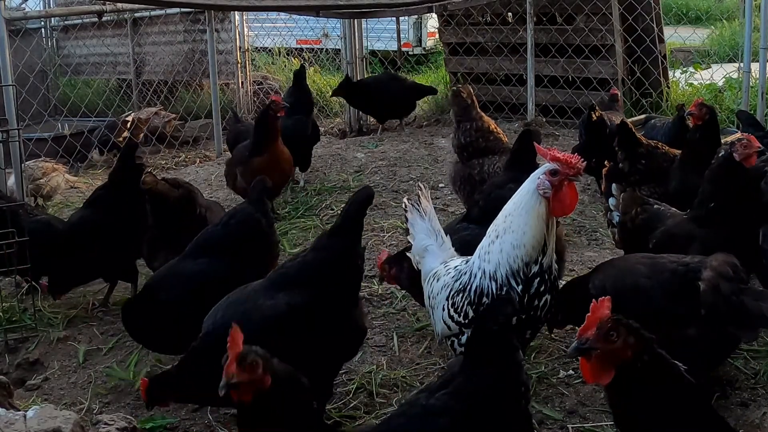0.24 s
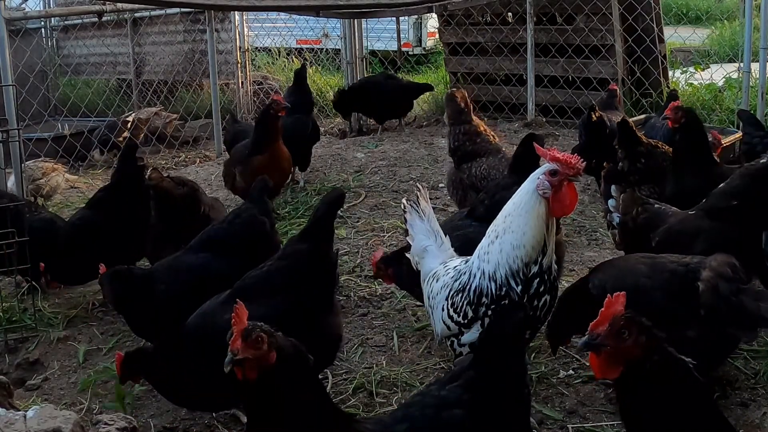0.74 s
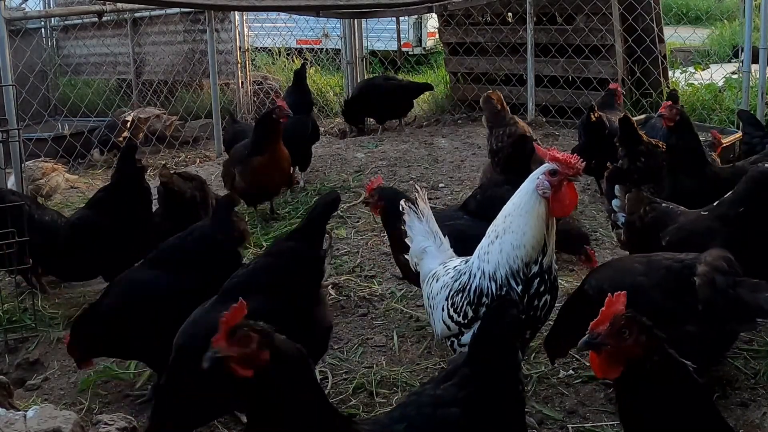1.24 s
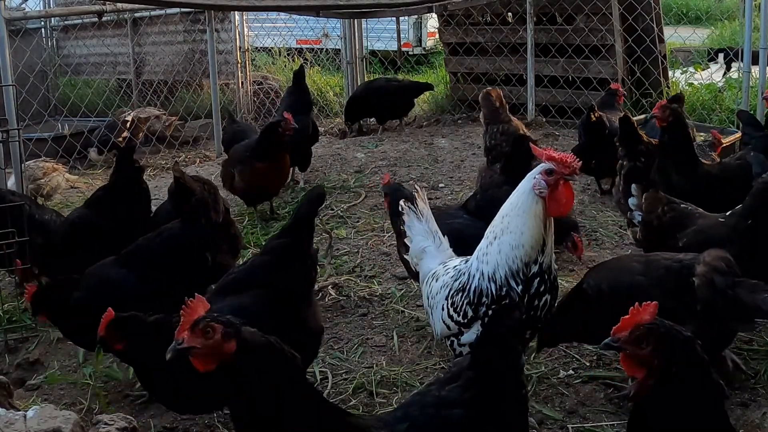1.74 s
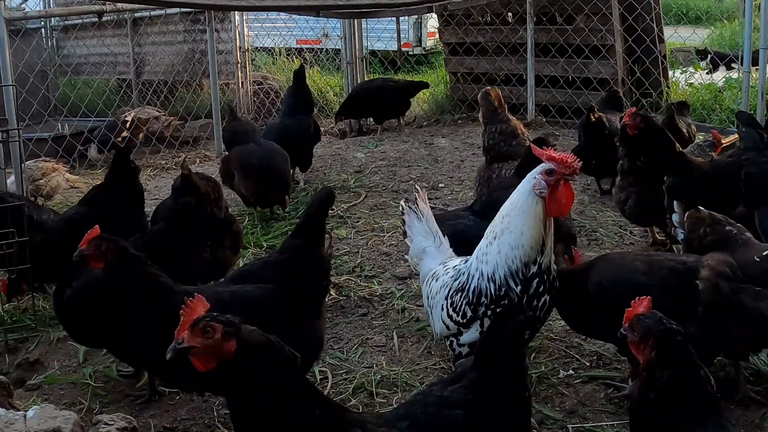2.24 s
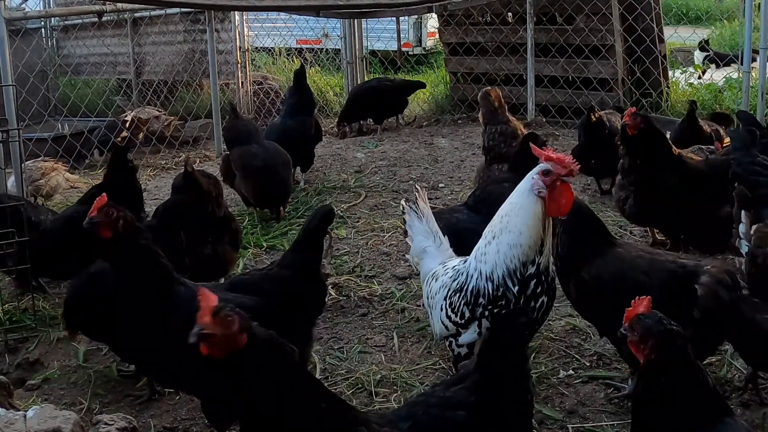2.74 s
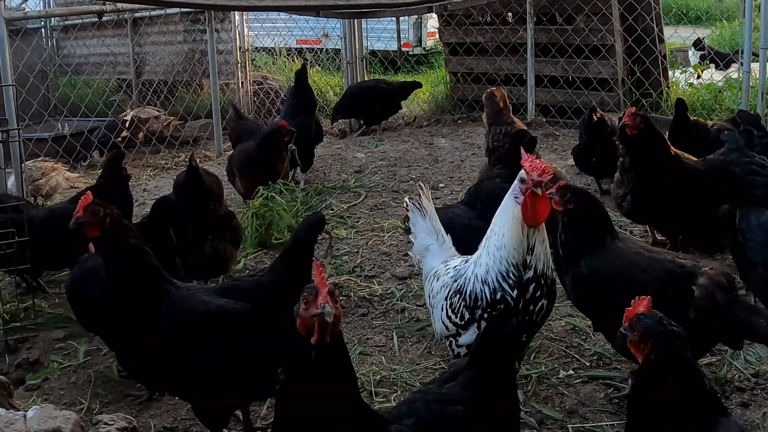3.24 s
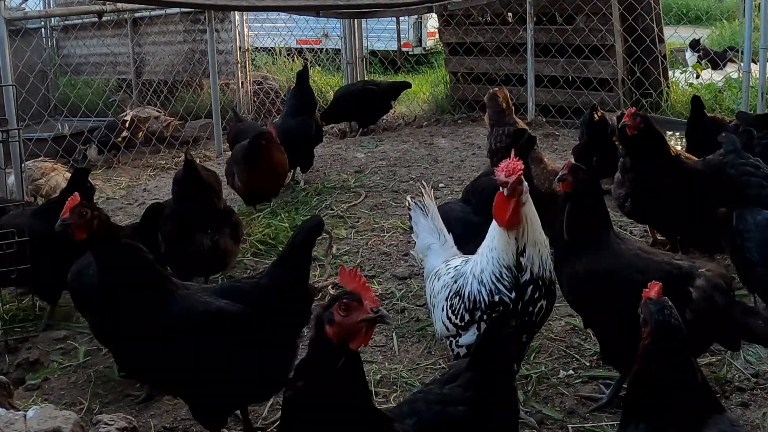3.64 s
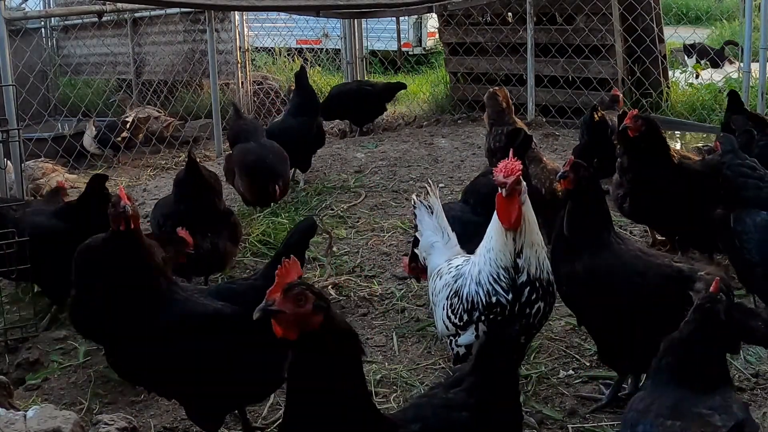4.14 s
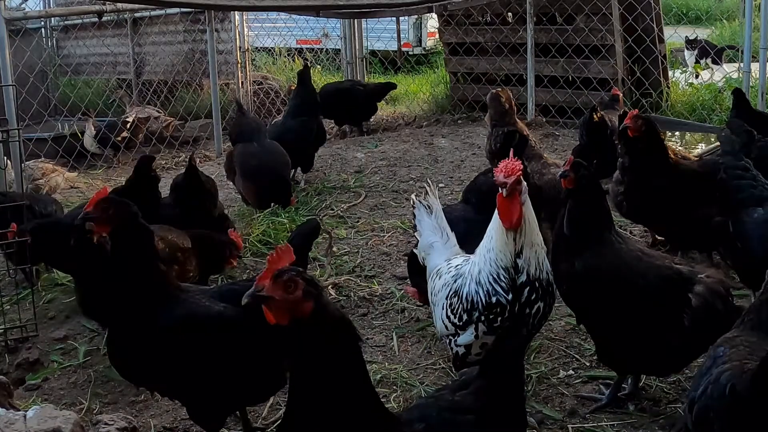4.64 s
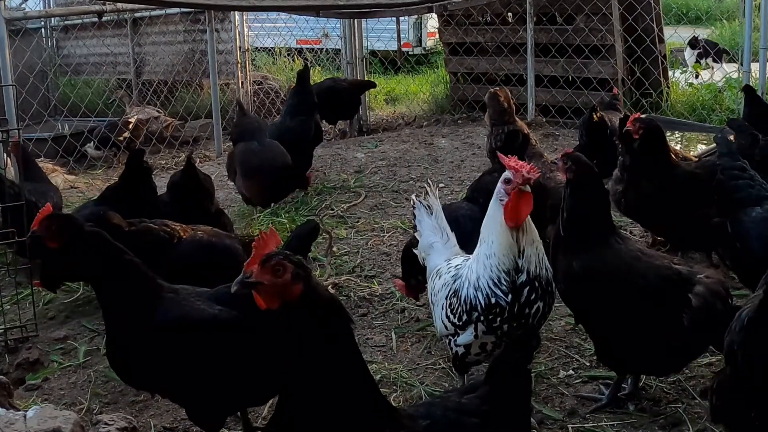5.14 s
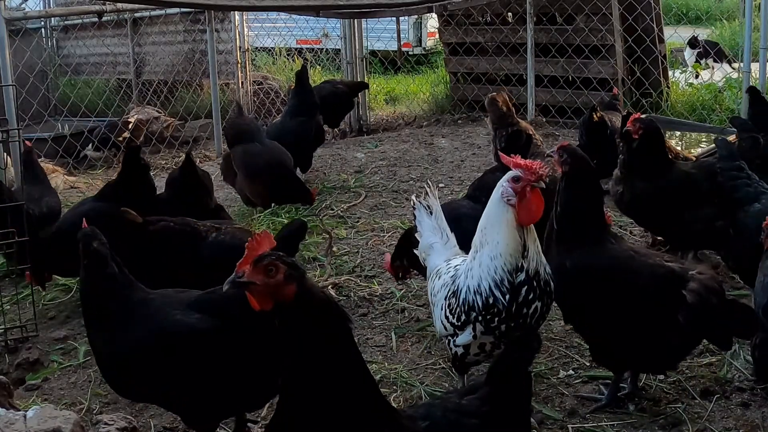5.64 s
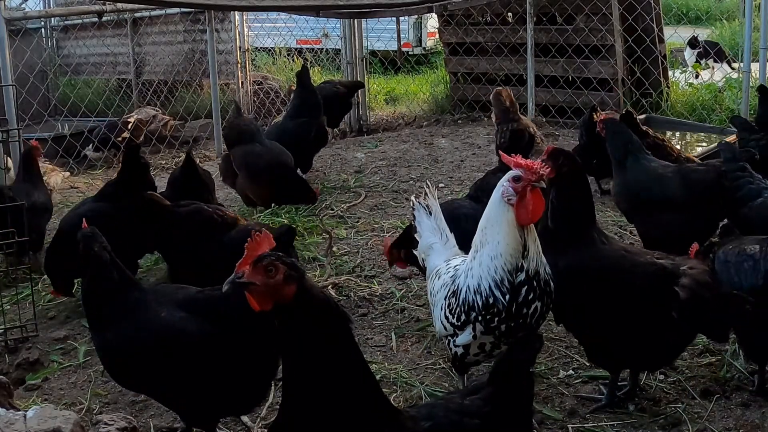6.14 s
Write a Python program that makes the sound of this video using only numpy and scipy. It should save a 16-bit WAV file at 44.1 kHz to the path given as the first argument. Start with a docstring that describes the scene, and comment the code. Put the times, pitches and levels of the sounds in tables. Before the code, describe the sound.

Chickens scratch soil and straw while one ends a strained rising moan, then come three quick clucks and one sharp, echoing squawk.

```python
"""An outdoor pen beside a shed: a hen ends a long, rising, hoarse call; later come three short clucks and a loud bark.
The call adds pure tones to rough throat pulses; clucks and bark are a few separate pulses ringing a throat.
Feet scuff soil and straw, claws rake and stalks snap: bursts of grains and filtered noise.
Crickets and distant small creatures are wavering tones; air and a breeze on the microphone are shaped noise.
The bark also comes back from a wall on the left, and the bird sounds have a short outdoor echo tail."""
import sys
import numpy as np
from scipy import signal
from scipy.io import wavfile
from scipy.ndimage import uniform_filter1d

SR = 44100
rng = np.random.default_rng(int(sys.argv[2]) if len(sys.argv) > 2 else 0)


def generate_wav(signal):
    """Clip the signal to [-1, 1] and save it as 16-bit WAV at the path in sys.argv[1]."""
    frames = np.transpose(np.atleast_2d(signal))
    scaled = np.clip(frames, -1, 1) * 32767
    pcm = np.round(scaled).astype(np.int16)
    wavfile.write(sys.argv[1], SR, pcm)


N = 281358

# Still air, tone colour: (pitch [Hz], level per Hz [dB])
AIR_COLOUR = [(120, -23), (200, 5.5), (412, -5), (761, -28.5), (1130, -11), (3230, -33), (4240, -10.5),
              (5550, -62), (8570, -54.5), (12700, -84.5), (15000, -54)]
# Strength of the breeze: (time [s], level [dB])
BREEZE = [(0.0, -58.5), (0.28, -63.5), (0.48, -48), (0.55, -56.5), (1.22, -56.5), (1.24, -47),
          (1.31, -61.5), (2.38, -51.5), (2.52, -59.5), (2.77, -51.5), (2.88, -60), (2.95, -54.5),
          (3.39, -52.5), (3.48, -68.5), (3.59, -55), (5.13, -58), (5.35, -52.5), (5.63, -58), (5.74, -54.5),
          (6.38, -55.5)]
# Breeze rumble, tone colour: (pitch [Hz], level per Hz [dB])
RUMBLE_COLOUR = [(12, -35), (20, -13), (65, 6), (77, -22.5), (109, -4.5), (206, -11.5), (344, -61.5),
                 (400, -6), (520, -51), (880, -120)]
# How alike left and right are in the noises: (pitch [Hz], likeness [-1 to 1])
LIKENESS = [(60, 0.98), (180, 0.19), (550, 0.38), (1650, 0.48), (4970, 0.027), (15000, 0.073)]
# Thin tones of distant insects and small birds:
# (time [s], length [s], start pitch [Hz], end pitch [Hz], level [dB], blur [0-1])
TRILLS = [(0.95, 0.2, 4830, 4830, -69, .25), (1.318, 0.065, 5070, 5050, -59, .1),
          (1.48, .13, 5050, 5000, -62, .35), (1.62, .83, 4980, 4955, -60, .2),
          (2.47, .045, 4950, 4950, -61, .1), (2.51, 0.17, 2870, 2850, -70, .35),
          (2.785, 0.11, 2840, 2840, -69, .3), (2.22, 0.09, 2920, 2920, -67, .3),
          (2.53, .07, 4850, 4850, -69, .5), (3.04, 0.13, 4950, 4980, -65, .3),
          (3.043, .11, 5300, 5300, -68, .7), (3.03, .13, 4280, 4300, -63, .3),
          (2.76, .11, 4280, 4300, -66, .3), (3.406, 0.07, 3320, 3350, -64, .3),
          (3.53, .2, 5250, 5200, -63, .35), (3.2, 0.12, 2150, 2150, -68, .5),
          (3.46, 0.28, 2130, 2200, -67, .5), (3.83, .38, 2200, 2050, -65, .5),
          (3.85, 0.15, 4050, 4000, -67, 1), (4.388, 0.032, 2200, 2200, -51.5, .2)]
# Chirps of the near cricket: (time [s], level [dB])
CHIRPS = [(0.13, -64.5), (0.52, -63), (0.801, -62), (1.577, -64), (1.829, -60), (2.129, -60.5),
          (2.321, -67), (2.526, -63), (2.779, -61.5), (3.053, -59.5), (3.298, -61), (3.624, -61.5),
          (4.002, -61.5), (4.291, -62.5), (4.63, -65.5), (4.859, -64), (5.15, -62.5), (5.429, -61),
          (5.722, -63), (5.978, -57.5), (6.268, -58.5)]
# Straw rustling: (time [s], coarse straw level [dB], fine straw level [dB])
RUSTLE = [(0.0, -65.5, -70.5), (0.39, -84, -73), (0.7, -69.5, -70), (0.9, -76, -77), (1.44, -71.5, -73),
          (1.72, -78, -68.5), (1.92, -63.5, -67), (2.29, -63, -70), (2.5, -68, -73.5), (3.07, -77.5, -71.5),
          (3.35, -61.5, -63), (3.84, -70.5, -73), (4.01, -67.5, -59.5), (4.19, -67.5, -62),
          (4.58, -61.5, -69.5), (4.85, -73.5, -76.5), (5.14, -74.5, -76), (5.22, -66, -64),
          (5.29, -73, -72), (5.81, -66, -69.5), (5.93, -64, -58), (6.13, -64.5, -71), (6.38, -65, -76)]
# Coarse straw, tone colour: (pitch [Hz], level per Hz [dB])
COARSE_COLOUR = [(410, -42), (700, -18.5), (851, -20), (1220, -4.5), (1940, -4), (2450, -6.5), (4200, 1.5),
                 (5460, -31.5), (9240, -120)]
# Fine straw, tone colour: (pitch [Hz], level per Hz [dB])
FINE_COLOUR = [(2500, -36), (4000, 14.5), (6000, 14.5), (8500, 7.5), (12400, -4), (15500, -22)]
# Claws raking the soil: (time of the peak [s], level [dB], time to fall 60 dB [s])
RAKES = [(1.09, -73, 0.057), (1.308, -62.5, 0.2), (1.63, -68, 0.35), (1.74, -58.5, 0.54),
         (2.351, -56, 0.15), (2.481, -60, 0.14), (3.001, -69.5, 0.016), (4.057, -59, 0.65),
         (4.328, -51.5, 0.025), (5.134, -70, 0.11), (5.529, -66.5, 0.21), (6.01, -61.5, 0.1)]
# Raked soil, tone colour: (pitch [Hz], level per Hz [dB])
SOIL_COLOUR = [(700, -55), (1000, 8), (1400, 9), (1900, 28), (2700, -11)]
# Straw snapping: (time [s], level 1 dB under the peak [dB], pitch [Hz], left minus right [dB])
TICKS = [(0.2642, -49, 7850, -1), (0.3262, -47, 5200, -3), (0.625, -54, 5110, -6), (1.2426, -57, 5970, 2.5),
         (1.311, -43, 4970, -2), (1.4133, -46.5, 5130, -3), (1.516, -48, 5400, 0), (1.5953, -69, 5140, 1),
         (1.953, -40, 5860, -1), (2.81, -60, 5300, -1.0), (2.9657, -57, 6900, -7), (3.002, -57, 5770, -0.5),
         (3.237, -54, 5040, 2), (4.3186, -54, 5720, -3), (4.7203, -53, 7950, 1.5),
         (4.7374, -66, 5000, -1.0), (4.782, -55, 6900, 4), (4.8377, -57, 6010, 0.5),
         (4.8843, -71, 6100, 0.5), (4.9492, -58, 7900, -2), (5.016, -49, 8450, 0), (5.343, -48, 8500, -4),
         (5.3928, -57, 7880, -0.5), (5.421, -43, 6100, -7), (5.5348, -58, 5220, 4),
         (5.6057, -47.5, 8100, -7), (5.724, -54, 5900, 1.5), (5.7597, -46, 5940, -5),
         (5.852, -46, 7600, -1), (6.117, -55, 5500, 0), (6.2946, -52, 5240, 0.5)]
# A foot lands: (time [s], strength of the knock before it rings [dB], pitch [Hz])
THUD = [(6.198, -44, 325)]
# Scuffing feet: (time [s], dull part before a 6.5 dB cut [dB], dull pitch [Hz], bright part [dB],
# left minus right [dB], time to fall 60 dB [s])
SCUFFS = [(0.045, -36, 1620, -102, 3, 0.086), (0.075, -43, 2180, -80, 9, 0.044),
          (0.2624, -50, 1960, -55, 1, 0.068), (0.323, -46.5, 2120, -54.5, 2, 0.11),
          (0.623, -51, 2988, -54, -2, 0.099), (1.243, -61, 2100, -51.5, 2, 0.033),
          (1.309, -48.5, 3440, -63, 7, 0.23), (1.373, -56.5, 2140, -62, -1, 0.12),
          (1.41, -55.5, 3100, -65, 6.5, 0.3), (1.5164, -56, 3840, -55, 2.5, 0.029),
          (1.592, -88, 3500, -54.5, -3, 0.09), (1.63, -50, 4640, -57.5, 4, 0.086),
          (1.722, -56.5, 2620, -85, -6, 0.33), (1.7655, -57, 2580, -62.5, -6, 0.33),
          (1.8492, -51.5, 2220, -62, 2, 0.21), (1.938, -48.5, 2260, -75, 4, 0.21),
          (1.9526, -79, 1930, -43.5, 0, 0.091), (1.9983, -56, 2610, -95, 11, 0.13),
          (2.03, -47, 2560, -69, 4, 0.18), (2.067, -51.5, 3130, -46.5, -1.5, 0.22),
          (2.118, -43.5, 2400, -92, 5.5, 0.17), (2.311, -58.5, 2400, -65, -6, 1),
          (2.436, -54.5, 2760, -85, 7, 0.082), (2.471, -54, 3700, -63, 0, 0.079),
          (3.464, -49.5, 3680, -79, 1, 0.042), (4.3187, -37.5, 2880, -52, -7, 0.073),
          (4.342, -46.5, 2450, -88, 6, 0.26), (4.7785, -65, 1760, -70, 3, 0.08),
          (5.011, -64.5, 3590, -61.5, 3, 0.14), (5.306, -60, 3680, -58, 1, 0.22),
          (5.3405, -62, 3580, -62, 2, 0.045), (5.3894, -58.5, 3240, -76, 11, 0.14),
          (5.414, -47, 3900, -53.5, 5, 0.15), (5.526, -51, 3800, -52.5, 3.5, 0.2),
          (5.604, -51, 3120, -53, 2, 0.11), (5.7224, -55, 1910, -73, 5, 0.13),
          (5.7557, -48, 3900, -58.5, 5.5, 0.38), (5.8476, -58, 3430, -68, 11.5, 0.58),
          (6.091, -52.5, 2460, -86, 8, 0.063), (6.1162, -50.5, 3270, -63, 6, 0.13),
          (6.3405, -56.5, 3070, -62, 1, 0.19)]
# Rings of the bright straw crackle: (pitch [Hz], width [Hz], level [dB])
SCUFF_BRIGHT = [(5450, 930, -1), (8230, 1300, -8), (10400, 3100, -14.5)]
# The one pitch that the shed wall favours: (pitch [Hz], width [Hz], level [dB])
SHED_RING = [(1950, 900, -30)]
# Clucks coming back off the ground and the birds close by: (delay [s], level [dB])
CLUCK_BOUNCES = [(.002, -10), (.0033, -12), (.0078, -15)]
# Clucks: (time [s], pulses [count], first gap [ms], second gap [ms], last gap [ms], overall strength [dB],
# then relative levels: first pulse [dB], second pulse [dB], last pulse [dB], windpipe ring [dB])
CLUCKS = [(3.3680, 4, 4.2, 7.0, 6.3, -32.5, -11, 0, -3, -10),
          (3.5712, 5, 3.8, 4.5, 6.6, -30.5, -16, -6, 1, -3),
          (3.7848, 5, 4.2, 5.0, 5.5, -29.5, -8, 0, -3, 3)]
# Rings of the throat in a cluck: (pitch [Hz], width [Hz], level [dB])
CLUCK_THROAT = [(194, 90, -8), (695, 150, -5), (1520, 380, 0.5), (2400, 1100, 2.5), (3180, 100, -3),
                (4470, 270, -19)]
# The bark: (time [s], pulses [count], first gap [ms], second gap [ms], last gap [ms], overall strength [dB],
# then relative levels: first pulse [dB], second pulse [dB], last pulse [dB], windpipe ring [dB])
BARK = [(4.5577, 7, 4.3, 3.95, 5.0, -23.5, -1.5, 0, -4, 8)]
# Rings of the throat in the bark: (pitch [Hz], width [Hz], level [dB])
BARK_THROAT = [(247, 53, -11), (490, 76, -28), (740, 46, -51), (1103, 76, -7.5), (1550, 180, 8),
               (2230, 210, -1), (3030, 240, -7), (3770, 166, -8.5), (4800, 500, -8), (5400, 420, -9.5),
               (6550, 450, -13.5), (8200, 700, -7.5), (11700, 1500, -18.5)]
# Long call: (time [s], pitch [Hz], first partial level [dB], uneven pulses level [dB],
# roughness [0-1, higher values count as 1])
CALL = [(0.0, 366.2, -44.5, -61, 0.8), (0.067, 375.2, -41.5, -54.5, 1.1),
        (0.129, 378.6, -42.5, -51.5, 0.73), (0.204, 381.3, -40.5, -48, 1), (0.246, 386.5, -40.5, -51, 1.07),
        (0.3, 392.8, -39, -46, 1.1), (0.399, 399.2, -38.5, -44.5, 0.65), (0.449, 405.7, -39, -47.5, 0.9),
        (0.486, 404.6, -37, -42, 0.29), (0.534, 413.2, -37, -42, 0.66), (0.575, 423.2, -37, -38.5, 0.3),
        (0.655, 420.7, -35, -38.5, 0.2), (0.69, 425, -37, -44.5, 0.7), (0.73, 411.2, -36.5, -40.5, 0.49),
        (0.781, 423, -37, -43, 0.2), (0.818, 416.5, -37, -39, 0.48)]
# Upper partials of the call: (multiple of the pitch [count], level relative to the shared upper level [dB])
CALL_UPPER = [(4, -2), (5, 0.5), (6, -6.5), (7, -2.5), (8, -0.5), (9, -13), (10, -14.5)]
# Rings of the throat in the long call: (pitch [Hz], width [Hz], level [dB])
CALL_THROAT = [(595, 290, -15), (1080, 120, 5), (1542, 79, 2), (3320, 600, -20)]
# Airy noise of the call, tone colour: (pitch [Hz], level per Hz [dB])
CALL_BREATH_COLOUR = [(400, -26.5), (700, 3), (1000, -9), (1500, -2), (2000, -8), (2800, 0), (3500, -12),
                      (5000, -27)]

AIR_DB = -64.5
GUSTS_DB, GUSTS_PER_S = 1.2, 6   # lumps shared by the whole rumble
TRILL_WIDTH_HZ, TRILL_WANDER, TRILL_EDGE_S = 60, .5, 0.012
THROBS_PER_S, THROB_DEPTH = 9.03, 0.65
TRILL_SWELL_DB_PER_S = 0.5
CHIRP_HZ, CHIRP_RISE_HZ, CHIRP_S = 4445, 79, .095
STROKES_PER_S, STROKE_DEPTH = 30, 0.26
LOWER_HZ, LOWER_DB, LOWER_EARLY_S = 4220, -11.5, 0.038   # second cricket; level and lead against the near one
RAKE_RISE_DB_PER_S = 431
TICK_WIDTH_HZ = 1300
SCUFF_RISE_S, CRACKLE_RISE_S, SOIL_RING_WIDTH_HZ = 0.0014, 0.0075, 1390
SHED_DB, NEAR_T60_S, FAR_T60_S = -6, 0.11, 0.28   # T60: time to fall 60 dB
CLUCK_SEND_DB, BARK_SEND_DB = -12, -12   # how much goes into the echo tail
WALL_S, WALL_DB, WALL_PAN_DB, WALL_LAG = .014, -6.5, 7, -6   # the bark off a wall on the left; lag in samples
CLUCK_RING, BARK_RING = (1100, 90), (2000, 300)   # windpipe ring: (pitch [Hz], width [Hz])
CLOSE_S, CLOSE_T60_S = .007, .04   # the beak shuts after the last pulse and damps the throat
BARK_SLOWING = 3.0   # power of the progress: the gaps stay even, then stretch at the end
RASP_HZ, CLUCK_RASP_DB, BARK_RASP_DB = 2800, -40, -21.5   # air hissing past the beak, outside the throat's rings
CLUCK_BREATH_DB, BARK_BREATH_DB = -19, -16
CALL_RELEASE_S, CALL_BREATH_DB = 0.014, -59.5
SECOND_DB = -10.5   # second partial against the first, 100 Hz away from the notch
NOTCH_HZ, NOTCH_WIDTH_HZ = 812, 4.8   # the second partial fades as it crosses this notch of the throat
THIRD_DB, THIRD_FOLLOWS = -44, 0.15   # level at mean effort; dB gained per dB of effort
UPPER_DB, UPPER_FOLLOWS = -65.5, 2.1   # the upper partials open with effort
JITTER_CYCLES, UPPER_FLUTTER_DB = .008, 2.0   # fast unsteadiness blurs the upper partials; each flutters alone
SLIP_CHANCE = .22   # per cycle at full roughness, the strong-weak order swaps
CUTOFF_HZ = 15600


def amp(db):
    """Turn decibels into a plain multiplier."""
    return 10 ** (np.asarray(db) / 20)


def rms_one(x):
    """Scale a sound to an average strength (rms) of 1."""
    return x / np.sqrt(np.mean(x ** 2) + 1e-20)


def in_time(rows):
    """Draw straight lines between the rows, giving each column a value at every sample."""
    s, *columns = np.transpose(rows)
    return [np.interp(np.arange(N) / SR, s, c) for c in columns]


def span(t0, t1, edge_s):
    """1 between two times, with soft edges outside them."""
    t = np.arange(N) / SR
    nearest_edge = np.minimum(t - t0 + edge_s, t1 - t + edge_s)
    return np.clip(nearest_edge / edge_s, 0, 1) ** 2


def at_hz(points, hz):
    """Read a pitch table, with pitch on a log scale as the ear hears it."""
    table_hz, values = np.array(points).T
    return np.interp(np.log(hz), np.log(table_hz), values)


def drift(rate):
    """Slow random wandering of rms 1; a higher rate [Hz] wanders faster."""
    r = np.exp(-80 * np.pi * rate / SR)   # worked out at every 40th sample
    noise = rng.standard_normal(N // 40 + 2002)
    slow = signal.lfilter([1], [1, -2 * r, r * r], noise)[2000:]
    return np.interp(np.arange(N) / 40, np.arange(len(slow)), rms_one(slow))


def resonate(x, modes, alternate=False):
    """Ring side-by-side resonances; like signs give a sharp click, alternating signs cancel the lows."""
    out = 0
    for k, (hz, width_hz, db) in enumerate(modes):
        r, w = np.exp(-np.pi * width_hz / SR), 2 * np.pi * hz / SR
        sign = (-1) ** (k * alternate)
        ring = signal.lfilter([0, np.sin(w)], [1, -2 * r * np.cos(w), r * r], x + 1e-18)
        out = out + sign * amp(db) * ring
    return out


def bandpass(x, low_hz, high_hz, order):
    """Keep what lies between two pitches."""
    return signal.sosfilt(signal.butter(order, [low_hz, high_hz], "band", fs=SR, output="sos"), x)


def place(x, pan_db, lag):
    """Place in stereo by level difference; the left side hears it `lag` samples later."""
    left = np.interp(np.arange(N) - lag, np.arange(N), x)
    return np.array([left * amp(pan_db / 2), x * amp(-pan_db / 2)])


def grains(per_s, spread_db, channels):
    """Random clicks of very uneven size, rms 1."""
    shape = (channels, N)
    sizes = amp(spread_db * np.minimum(rng.exponential(1, shape), 4)) * rng.choice([-1, 1], shape)
    return rms_one(sizes * (rng.random(shape) < per_s / SR))


def banded(white, spectrum, patchy_db, flicker):
    """Half-octave noise bands, each with its own level, flicker and left-right likeness; rms 1."""
    out, edges = 0, 20 * 2 ** np.arange(0, 10, .5)
    for k, (low, high) in enumerate(zip(edges, np.minimum(edges[1:], 19000))):
        hz = np.sqrt(low * high)
        if spectrum[0][0] <= hz <= spectrum[-1][0]:
            mid, side = bandpass(white[k % 2], low, high, 2)   # neighbouring bands use different noise
            alike = np.clip(at_hz(LIKENESS, hz), -1, 1)
            gain = amp(at_hz(spectrum, hz) + patchy_db * drift(flicker))
            out = out + gain * (np.sqrt(1 + alike) * mid + np.sqrt(1 - alike) * side * [[1], [-1]])
    return rms_one(out)


def air_and_breeze(white):
    """Steady air noise, plus a breeze whose low rumble on the microphone rises and falls."""
    air = amp(AIR_DB) * banded(white, AIR_COLOUR, 3.5, 6.2)
    breeze_db = in_time(BREEZE)[0] + GUSTS_DB * drift(GUSTS_PER_S)
    return air + amp(breeze_db) * banded(white[::-1], RUMBLE_COLOUR, 2.7, 5.3)


def trills():
    """Thin, unevenly throbbing tones from further off; blur trades a steady tone for a wandering one."""
    out = np.zeros(N)
    throb = np.sin(np.pi * (THROBS_PER_S * np.arange(N) / SR + 0.35 * drift(12.0))) ** 2
    narrow, wide = [drift(width_hz) + 1j * drift(width_hz) for width_hz in (TRILL_WIDTH_HZ, 200)]
    for s, length_s, hz, end_hz, db, blur in TRILLS:
        i, blur = int(s * SR), np.clip(blur, 0, 1)
        t = np.arange(int(length_s * SR)) / SR
        part = slice(i, i + len(t))
        edges = np.clip(np.minimum(t, length_s - t) / TRILL_EDGE_S, 0, 1)
        shape = edges * (1 - THROB_DEPTH * throb[part])
        wander = (1 - blur) * (1 + TRILL_WANDER * narrow[part]) + blur * wide[part]
        glide_hz = hz + (end_hz - hz) * t / length_s / 2   # average pitch so far, for a straight glide
        tone = wander * np.exp(2j * np.pi * glide_hz * t)
        out[part] += amp(db + TRILL_SWELL_DB_PER_S * t) * shape * np.real(tone)
    return place(out, 1.0, 1.35)


def fuzzy_tone(hz, width_hz, steady):
    """A tone whose size and phase wander by slow chance; rms 1."""
    wander = steady + drift(width_hz) + 1j * drift(width_hz)
    cycles = np.cumsum(hz + np.zeros(N)) / SR
    return rms_one(np.real(wander * np.exp(2j * np.pi * cycles)))


def crickets():
    """A near cricket whose chirps rise a little, and a lower one that starts just ahead of it."""
    t, level, rise = np.arange(N) / SR, np.zeros(N), np.zeros(N)
    for s, db in CHIRPS:
        strokes = 1 - STROKE_DEPTH * np.cos(np.pi * STROKES_PER_S * (t - s)) ** 2
        level += amp(db) * span(s + 0.0043, s + CHIRP_S, 0.032) * strokes
        rise += span(s, s + CHIRP_S, 0.099) * np.clip((t - s) / CHIRP_S, 0, 1)
    near = level * fuzzy_tone(CHIRP_HZ + CHIRP_RISE_HZ * rise, 85, 0.15)
    early = int(LOWER_EARLY_S * SR)
    ahead = np.r_[level[early:], np.zeros(early)]
    lower = amp(LOWER_DB) * ahead * fuzzy_tone(LOWER_HZ, 110, 0.21)
    return place(near, 0.87, 2.4) + place(lower, -0.37, -1.6)


def straw_rustle(crackle):
    """Coarse and fine straw: random grains filtered into two tone colours, each with its own level."""
    coarse_db, fine_db = in_time(RUSTLE)
    coarse = amp(coarse_db) * banded(crackle, COARSE_COLOUR, 2, 15)
    return coarse + amp(fine_db) * banded(crackle[::-1], FINE_COLOUR, 2.5, 20)


def claw_rakes(crackle):
    """Claws rake the soil: gritty noise that swells fast and dies away with each stroke."""
    t, gain = np.arange(N) / SR, 0
    for s, db, t60 in RAKES:
        gain = gain + amp(db + np.minimum(RAKE_RISE_DB_PER_S * (t - s), -60 * (t - s) / t60))
    return gain * banded(crackle[:, ::-1], SOIL_COLOUR, 5.2, 19.0)


def straw_ticks():
    """Single stalks snap: a tiny splintering burst that rings for a millisecond or two."""
    out = np.zeros((2, N + 300))
    splinter = rng.standard_normal((len(TICKS), 300)) * amp(-np.arange(300) * .5)
    for (s, db, hz, pan_db), burst in zip(TICKS, splinter):
        i = int(s * SR)
        ring = resonate(resonate(burst, [(hz, 2 * TICK_WIDTH_HZ, 0)]), [(hz, TICK_WIDTH_HZ, 0)])
        gain = amp(db + 1 + np.array([[pan_db / 2], [-pan_db / 2]]))
        out[:, i:i + len(ring)] += ring / np.abs(ring).max() * gain
    return out[:, :N]


def thud():
    """A foot lands: a softened click rings two low resonances as a dull knock."""
    click = np.zeros(N)
    s, db, hz = THUD[0]
    click[int(s * SR)] = amp(db)
    soft = signal.lfilter(np.hanning(30) / 10, [1], click)
    return resonate(soft, [(hz, 120, 0), (700, 400, -6)])


def scuffs():
    """Each scuff is a swarm of grains: a dull ring of soil and a bright crackle of straw."""
    out = np.zeros((2, N))
    grit = np.diff(grains(5000, 1.1, channels=1)[0], prepend=0)   # light grains push no bass
    straw = np.diff(grains(7100, 1.5, channels=2), prepend=0)
    bright = rms_one(resonate(straw, SCUFF_BRIGHT, alternate=True))
    for s, dull_db, hz, bright_db, pan_db, t60 in SCUFFS:
        i, ring = int(s * SR), [(hz, SOIL_RING_WIDTH_HZ, 0)]
        t = np.arange(min(int(.3 * SR), N - i)) / SR
        part = slice(i, i + len(t))
        dull = rms_one(resonate(resonate(grit[part], ring), ring)) * np.minimum(t / SCUFF_RISE_S, 1)
        crackle = bright[:, part] * np.minimum(t / CRACKLE_RISE_S, 1)
        mix = amp(dull_db - 6.5) * dull + amp(bright_db) * crackle
        out[:, part] += mix * amp(-60 * t / max(t60, .01)) * amp([[pan_db / 2], [-pan_db / 2]])
    return out


def shed(x, far_db):
    """Quick scatter from ground and flock, then a slow tail from fence and shed, partly own in each channel."""
    t = np.arange(int(.5 * SR)) / SR
    fade = amp(-60 * t / NEAR_T60_S) + amp(far_db - 60 * t / FAR_T60_S)
    shape = fade * np.clip(t / 0.029, 0, 1)
    common, own = rng.standard_normal(len(t)), rng.standard_normal((2, len(t)))
    tail = bandpass((common + 0.65 * own) * shape, 600, 7000, 1)
    tail = amp(SHED_DB) * tail / np.sqrt(np.sum(tail ** 2) / 2)
    return signal.fftconvolve(x[None], tail, axes=1)[:, :N]


def pulsed(calls, throat, ring, breath_db, rasp_db, top_hz, alternate, slowing=1):
    """A few separate voice-box pulses, each followed by a puff of air, through throat and windpipe."""
    out, t = np.zeros(N), np.arange(SR // 5) / SR
    for s, count, first_ms, second_ms, last_ms, peak_db, first_db, second_db, last_db, ring_db in calls:
        progress = np.linspace(0, 1, count - 2) ** slowing
        at_s = np.cumsum(np.r_[0, first_ms, second_ms + (last_ms - second_ms) * progress]) / 1000
        source = np.zeros(len(t))
        pulse_db = np.r_[first_db, second_db, np.linspace(0, last_db, count - 2)]
        source[(at_s * SR).astype(int)] = amp(peak_db + pulse_db)
        hiss = np.diff(rng.standard_normal(len(t) + 1))   # weak in the bass
        puff = signal.lfilter([1], [1, -.992], source) * hiss
        pulse = signal.lfilter(np.hanning(7) / 3, [1], source + amp(breath_db) * puff)
        soft = signal.sosfilt(signal.butter(4, top_hz, fs=SR, output="sos"), pulse)
        windpipe = resonate(soft, [(*ring, ring_db)])
        voice = resonate(soft, throat, alternate) + (-1) ** alternate * windpipe
        voice = voice + amp(rasp_db) * bandpass(puff, RASP_HZ, top_hz, 2)
        closing = amp(-60 * np.maximum(t - at_s[-1] - CLOSE_S, 0) / CLOSE_T60_S)
        i = int(s * SR)
        out[i:i + len(t)] += voice * closing
    return out


def three_clucks():
    """Short pulsed calls, low in bass, with quick bounces off the ground and nearby birds."""
    clucks = pulsed(CLUCKS, CLUCK_THROAT, CLUCK_RING, CLUCK_BREATH_DB, CLUCK_RASP_DB, 4300, alternate=False)
    # a small beak radiates little bass
    clucks = signal.sosfilt(signal.butter(1, 250, "high", fs=SR, output="sos"), clucks)
    # low heads, so the ground answers at once
    return clucks + sum(amp(db) * np.roll(clucks, int(s * SR)) for s, db in CLUCK_BOUNCES)


def loud_bark():
    """One loud pulsed call with a bright throat and a strong rasp of air."""
    return pulsed(BARK, BARK_THROAT, BARK_RING, BARK_BREATH_DB, BARK_RASP_DB, 8900,
                  alternate=True, slowing=BARK_SLOWING)


def call_breath(white):
    """Airy noise that lasts as long as the long call."""
    level = amp(CALL_BREATH_DB) * span(0, CALL[-1][0], CALL_RELEASE_S)
    return level * banded(white[:, ::-1], CALL_BREATH_COLOUR, 3.0, 25)


def long_call():
    """Clean partials, plus strong-weak throat pulses that turn hoarse when the pattern breaks."""
    hz, first_db, uneven_db, hoarse = in_time(CALL)
    hoarse = np.clip(hoarse, 0, 1)
    effort_db = first_db - np.mean([row[2] for row in CALL])
    notch_gain = np.hypot(2 * hz - NOTCH_HZ, NOTCH_WIDTH_HZ) / 100
    second_db = first_db + SECOND_DB + 20 * np.log10(notch_gain)
    third_db = THIRD_DB + THIRD_FOLLOWS * effort_db
    upper_db = UPPER_DB + UPPER_FOLLOWS * effort_db
    partials = [(1, first_db), (2, second_db), (3, third_db)]
    partials += [(k, upper_db + db + UPPER_FLUTTER_DB * drift(30)) for k, db in CALL_UPPER]
    cycles = np.cumsum(hz) / SR
    wobble = .012 * drift(40) + .05 * drift(8) + JITTER_CYCLES * drift(120)
    clean = 0
    for k, db in partials:
        clean = clean + np.sqrt(2) * amp(db) * np.sin(2 * np.pi * k * (cycles + wobble) + k * k)
    clean = clean * amp(0.97 * hoarse * drift(48))   # a hoarse voice flutters in level

    at = np.flatnonzero(np.diff(np.floor(cycles)))   # one pulse per cycle
    share = hoarse[at]
    slips = rng.random(N)[at] < SLIP_CHANCE * share ** 2
    order = np.arange(len(at)) + np.cumsum(slips)
    pulses = np.zeros(N)
    # alternating signs put the rings at half steps between the partials
    pulses[at] = (1 - .6 * share) * (-1) ** order + .6 * share * rng.standard_normal(N)[at]
    ringing = resonate(np.diff(pulses, prepend=0), CALL_THROAT)
    ringing = resonate(ringing, [(1064, 320, 2.5), (3000, 1000, -1.0)])
    ringing = ringing / np.sqrt(uniform_filter1d(ringing ** 2, size=2500) + 1e-9)   # even out the level
    return (clean + amp(uneven_db) * ringing) * span(0, CALL[-1][0], CALL_RELEASE_S)


def birds():
    """Place the call, clucks and bark, with their echo tails and the bark's return from the wall."""
    call, clucks, bark = long_call(), three_clucks(), loud_bark()
    direct = place(call, -1.3, 2.8) + place(clucks, -1.1, 2.4) + place(bark, 1.3, 1.8)
    soft_tail = shed(amp(-13.5) * call + amp(CLUCK_SEND_DB) * clucks, -30.0)
    wall = amp(WALL_DB) * place(np.roll(bark, int(WALL_S * SR)), WALL_PAN_DB, WALL_LAG)
    bark_tail = shed(amp(BARK_SEND_DB) * bark + resonate(bark, SHED_RING), -3.5)
    # the bark's tail leans to the left: 1.5 dB up there, 1.5 dB down on the right
    return direct + soft_tail + wall + bark_tail * amp([[1.5], [-1.5]])


def scene():
    """Add up air, insects, ground noises and the birds near the microphone."""
    white = rng.standard_normal((2, 2, N))
    crackle = grains(7000, 2.2, channels=4).reshape(2, 2, N)
    background = air_and_breeze(white) + trills() + crickets()
    ground = straw_rustle(crackle) + claw_rakes(crackle) + straw_ticks() + thud() + scuffs()
    return background + ground + call_breath(white) + birds()


def record(dry):
    """Cut the very top of the sound steeply."""
    return signal.sosfilt(signal.cheby2(12, 70, CUTOFF_HZ, fs=SR, output="sos"), dry)


dry = scene()
out = record(dry)
generate_wav(out)
```